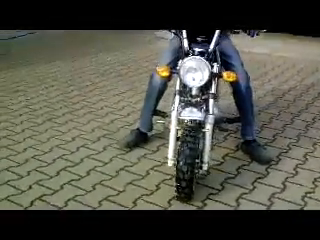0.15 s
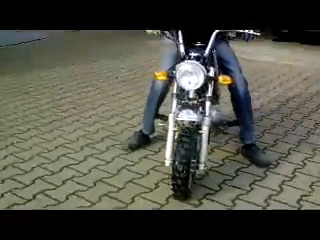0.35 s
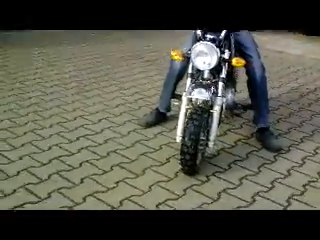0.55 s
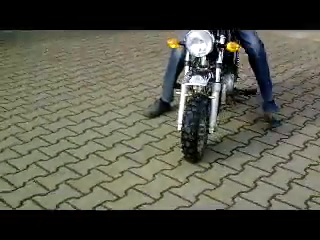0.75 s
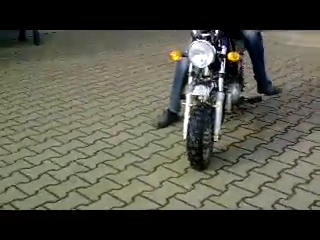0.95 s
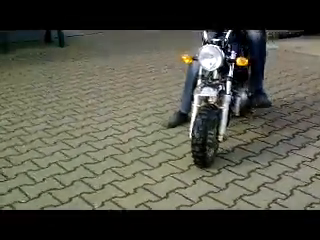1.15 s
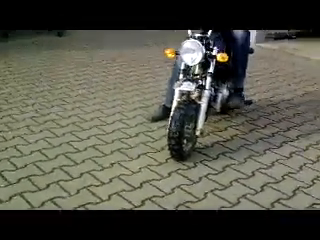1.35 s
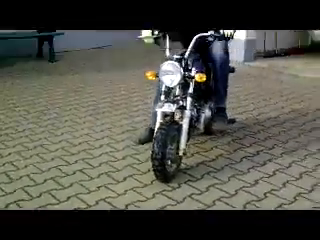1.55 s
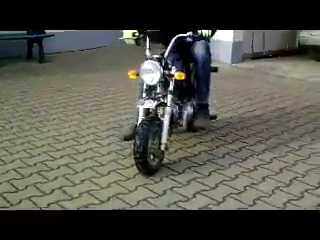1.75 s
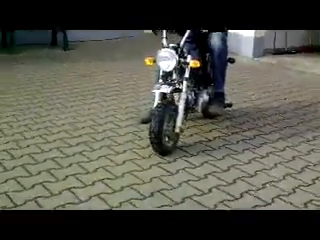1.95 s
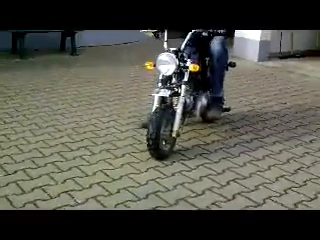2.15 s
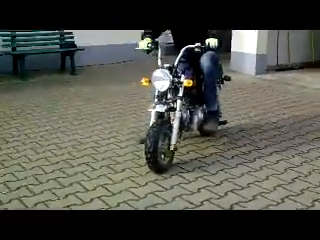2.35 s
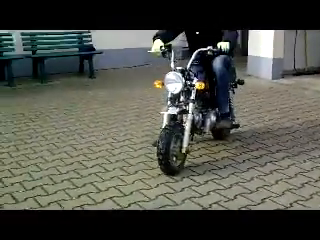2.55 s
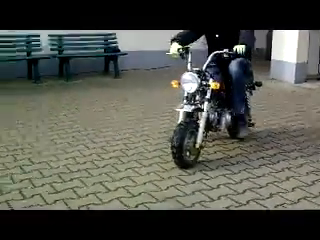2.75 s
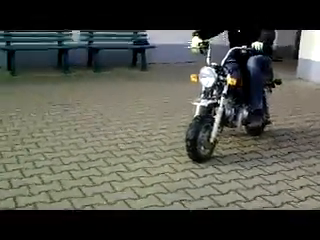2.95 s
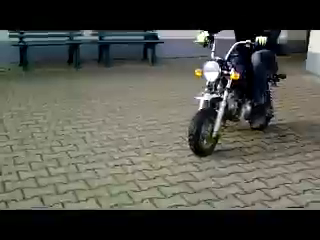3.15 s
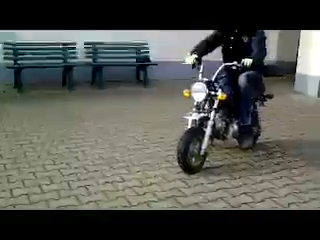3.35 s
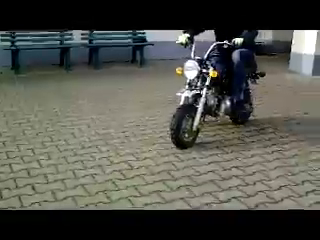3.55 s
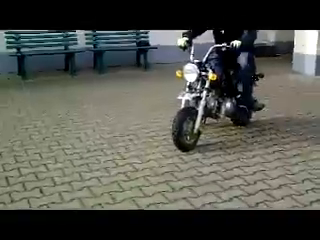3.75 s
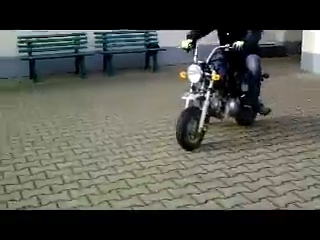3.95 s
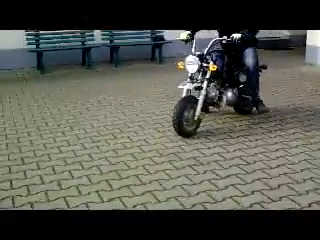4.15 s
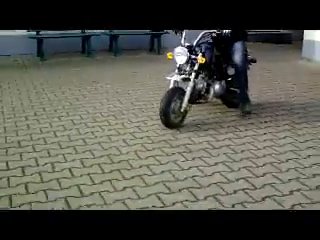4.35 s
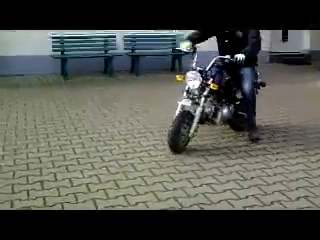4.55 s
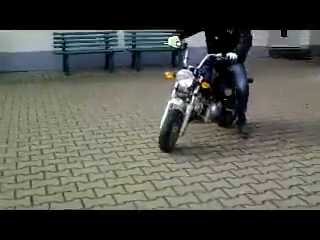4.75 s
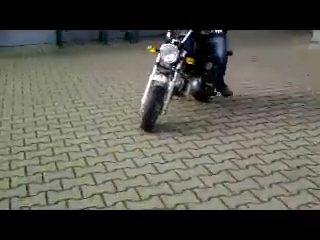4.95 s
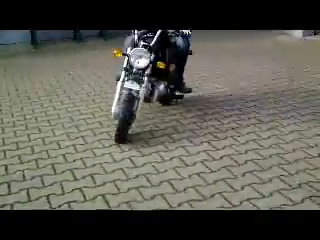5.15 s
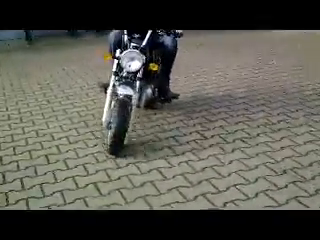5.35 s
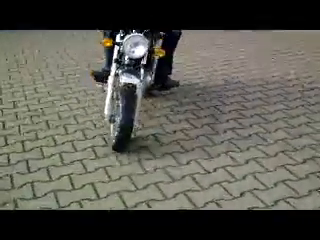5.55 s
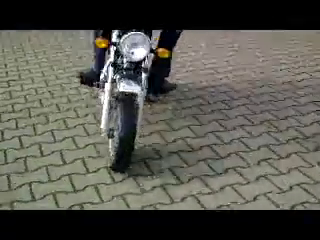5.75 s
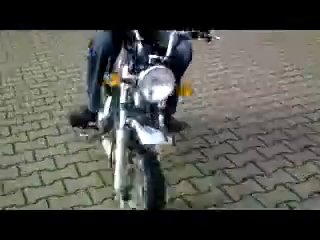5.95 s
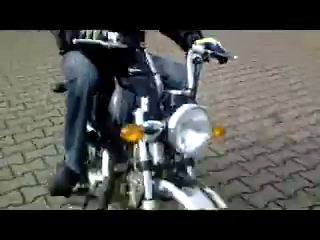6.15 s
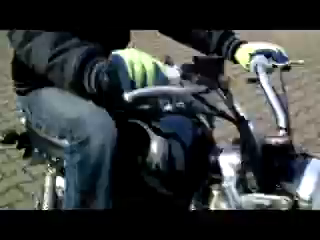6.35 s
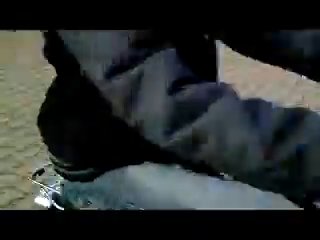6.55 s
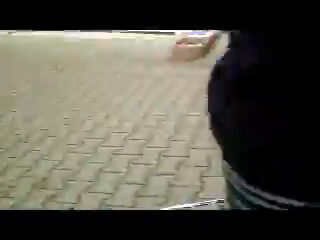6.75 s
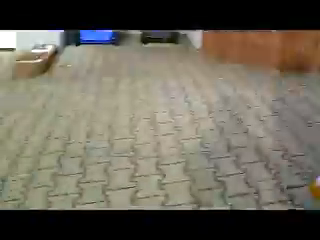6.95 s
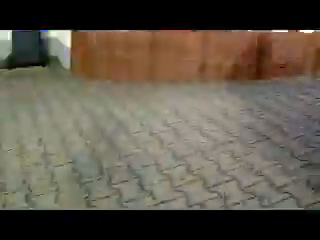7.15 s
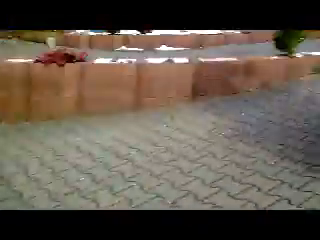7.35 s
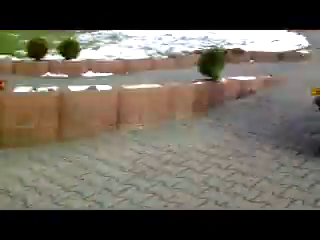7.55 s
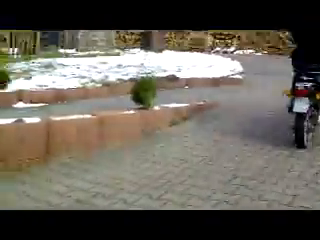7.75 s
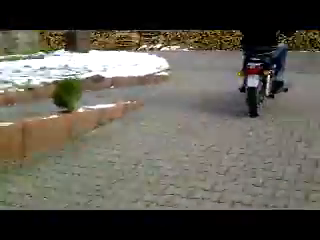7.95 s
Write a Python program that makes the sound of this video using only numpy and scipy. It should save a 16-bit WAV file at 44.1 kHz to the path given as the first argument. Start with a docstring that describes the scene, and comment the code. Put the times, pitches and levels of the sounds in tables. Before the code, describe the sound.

A small single-cylinder motorbike revs, idles unevenly, then accelerates close past and rides away across a paved yard.

```python
"""A paved yard, where a one-cylinder four-stroke mini bike revs twice, idles unevenly with a few clanks,
then pulls away, passes close by and leaves with its exhaust pointing back at us.
Each firing of the engine makes a thump in the silencer, a ring and a bark in the pipe and a puff of rasp.
With the throttle shut, the piston adds a second beat and the idle pops and stumbles.
The walls echo it all over a low outdoor rumble."""
import sys
import numpy as np
from scipy import signal
from scipy.io import wavfile
from scipy.ndimage import uniform_filter1d

SR = 44100
rng = np.random.default_rng(int(sys.argv[2]) if len(sys.argv) > 2 else 0)


def store_pcm(level_fs):
    """Save levels as 16-bit WAV."""
    pcm = np.round(np.clip(level_fs, -1, 1) * 32767).astype(np.int16)
    wavfile.write(sys.argv[1], SR, np.atleast_2d(pcm).T)


N = 353682
TIME = np.arange(N) / SR
IDLE_RATE, PULLING_RATE = 15, 26  # firings a second
USUAL_DISTANCE_M = 3

# how fast the engine runs: (time [s], firings [per s])
ENGINE_SPEED = [(0.0, 24.138), (0.13, 25.523), (0.5, 22.395), (0.64, 27.3), (.8, 26), (0.9, 24.428),
                (1.02, 22.6), (1.25, 20.804), (1.35, 19.3), (1.55, 19.35), (1.8, 16.872), (2.43, 12.51),
                (2.6, 19.153), (3.08, 15.713), (3.32, 14.992), (3.42, 20.253), (3.75, 23.941),
                (3.85, 24.75), (3.97, 26.3), (4.35, 26.48), (4.6, 27.204), (4.95, 26.614), (5.12, 25.205),
                (5.38, 25.3), (5.58, 23.045), (5.72, 24.705), (6.1, 31.285), (6.5, 35.508), (6.85, 38.994),
                (7.05, 39.393), (7.25, 41.104), (7.42, 41.898), (7.6, 43.302), (8.02, 45.356)]
# the bike's ride: (time [s], distance [m], share heard from behind [0-1], wall echo delay [s])
BIKE_PATH = [(0, 1.77, 0, 0.025), (.7, 2.47, 0.09, 0.021), (1.3, 2.35, 0.2, 0.016), (2.1, 2.02, 0, 0.018),
             (2.6, 1.97, 0.03, 0.011), (3.6, 2.58, 0.2, 0.022), (4.5, 2.39, 0.15, 0.016),
             (5.4, 2.07, 0.08, 0.022), (5.8, 2.44, 0.14, 0.018), (6.15, 1.12, 0.07, .02),
             (6.58, 0.75, 0.26, 0.016), (6.92, 1.1, 0.83, 0.016), (7.2, 1.59, 0.97, 0.014),
             (8.02, 2.37, 0.79, 0.0075)]


def engine():
    """The firings drive the exhaust and shake the metal. Returns the low thump and the sharper sounds."""
    rate, = curves(ENGINE_SPEED)
    uneven_db = 1.3 * (IDLE_RATE / rate) ** 2  # a slow engine fires less evenly
    thump = silencer_thump(rate, uneven_db)
    burble = idle_burble(rate, uneven_db)
    # the steep front of each gush of gas hits the pipe like a blow
    blows = -np.sqrt(lumps()) * pulses(rate, uneven_db, lead=0.00048, jitter=.00002)
    pipe = pipe_ring(blows, rate) + pipe_bark(blows)
    return thump, burble + pipe + gas_rasp(blows, rate, uneven_db) + casing_rattle(rate)


def silencer_thump(rate, uneven_db):
    """Each gush of gas leaves with a thump. With the throttle shut, the rising piston adds a beat."""
    # tone of the thump from the front, from behind, and of the piston's push: (pitch [Hz], level [dB])
    front_tone = [(25, -61), (45, -30.5), (75, -19.5), (97, -10), (120, -5), (160, -0.5), (210, -4),
                  (240, -10.5), (280, -21.5), (380, -29), (480, -43), (900, -24), (3000, -96)]
    rear_tone = [(30, -36), (85, -13.5), (122, -22.5), (160, 5), (203, 11), (228, 8.5), (260, 0.5),
                 (305, -4.5), (355, -7), (425, -9), (520, -14), (620, -5), (900, -25), (3000, -56.5)]
    piston_tone = [(25, -63), (50, -37), (80, -12.5), (115, -5.5), (160, 5), (215, -5), (280, -15.5),
                   (400, -6.5), (520, -33), (900, -42), (3000, -88)]
    level_db, strength = loudness("thump", rate), lumps()
    gushes = strength * pulses(rate, uneven_db, lead=0.003717, jitter=.00004)
    thump = amp(level_db) * unit_level(facing(gushes, front_tone, rear_tone))
    pushes = pulses(rate, uneven_db, lead=.008 - .37 / rate, jitter=0.00047)  # about 1/3 cycle later
    second_beat = amp(level_db - 4) * colour(pushes * np.sqrt(strength), piston_tone)
    beat_share = throttle_shut() * np.clip(2 * idleness(rate), 0, 1)
    return thump * amp(-2.5 * beat_share) + beat_share * second_beat


def pipe_ring(blows, rate):
    """Each blow rings the pipe. With the throttle shut, little gas flows and a thin note rings on."""
    # the pipe's note shifts with the heat of the gas and the bike's heading: (time [s], pitch [Hz])
    pipe_note = [(0, 606), (3.4, 609), (3.8, 696), (4.2, 668), (4.5, 660), (4.9, 652), (5.2, 660),
                 (5.5, 660), (5.75, 629), (6.2, 651), (6.55, 688), (6.66, 725), (6.72, 825), (6.87, 860),
                 (6.95, 1010), (8.02, 1083)]
    # the pipe's resonances: (multiple of that note, width [Hz], level [dB])
    pipe_modes = [(1, 68, 25), (1.08, 8.5, 1), (.92, 31, 16.5)]
    hz, = curves(pipe_note)
    _, extra_db = throttle()
    ring = sum(amp(db) * resonate(blows, hz * multiple, width) for multiple, width, db in pipe_modes)
    ring = resonate(ring, hz, width_hz=136)  # the outlet narrows the tone once more
    ring = amp(loudness("ring", rate) + extra_db) * unit_level(ring)
    thin_note = unit_level(resonate(blows, hz=660, width_hz=13))
    return ring + throttle_shut() * amp(-50.5 - 20 * idleness(rate) ** 2) * thin_note


def pipe_bark(blows):
    """The pipe barks: one tight pop with the throttle open, spreading into a flutter as it shuts."""
    # tone of the bark from the front and from behind: (pitch [Hz], level [dB])
    front_tone = [(250, -48), (520, -34.5), (620, 0.5), (720, 4), (790, 13), (860, 3.5), (1020, 2),
                  (1200, -2.5), (1550, -20), (2050, -5.5), (2900, -29.5), (8000, -37.5)]
    rear_tone = [(130, -31.5), (280, 4.5), (430, 12.5), (520, 0), (680, -14), (830, 12.5), (920, 0.5),
                 (1050, 12.5), (1250, 3), (1500, -3.5), (2100, -36), (2900, -33), (8000, -34.5)]
    rate, = curves(ENGINE_SPEED)
    opening, _ = throttle()
    flutter = amp(-7 - 22 * opening) * puffs(blows, decay_s=.012)
    return amp(loudness("bark", rate)) * unit_level(facing(blows + flutter, front_tone, rear_tone))


def gas_rasp(blows, rate, uneven_db):
    """Gas tears past the valve, valves tick shut, chain and gears whirr. Open throttle adds a spit."""
    # tone of the rasp and of the short spit that starts a firing: (pitch [Hz], level [dB])
    rasp_tone = [(300, -35), (900, 8), (1350, -0.5), (1750, -3.5), (2100, -1), (2500, -7), (3100, -14.5),
                 (4000, -13.5), (5200, -16.5), (6400, -20.5), (7900, -29.5), (8900, -25), (9500, -32.5),
                 (10500, -48)]
    spit_tone = [(400, -28.5), (900, -6.5), (1400, 4), (2200, 2), (2900, -8.5), (6000, -17), (10000, -37)]
    opening, _ = throttle()
    valves = pulses(rate, uneven_db + 8.5, lead=0.0059, jitter=0.00013)
    valves += pulses(rate, uneven_db - 1, lead=-0.0038, jitter=0.00036)
    whirr = amp(-18) * puffs(valves, decay_s=0.0027) + amp(-1.5) * rng.standard_normal(N)
    tear_gain = amp(-10 + 12.6 * opening)
    grit = (tear_gain * puffs(blows, decay_s=0.0097) + whirr) / np.sqrt(.5 + tear_gain ** 2)
    spit = opening ** 2 * amp(-1.5) * colour(puffs(blows, decay_s=.002), spit_tone)
    return amp(loudness("rasp", rate)) * (colour(grit, rasp_tone) + spit)


def idle_burble(rate, uneven_db):
    """At idle, fuel burns late and raggedly, so a hollow burble follows each thump."""
    # tone of the burble: (pitch [Hz], level [dB])
    burble_tone = [(55, -11), (105, -2), (165, -6), (280, 4), (350, 0.5), (420, 9), (500, 3), (600, -34.5),
                   (1000, -21), (3000, -79)]
    late_burns = lumps() ** 2.2 * pulses(rate, uneven_db, lead=-0.0011, jitter=0.00028)
    burble = colour(late_burns + puffs(late_burns, decay_s=0.0097), burble_tone)
    return idleness(rate) * amp(loudness("thump", rate) - 17) * burble


def silencer_boom():
    """The outflowing gas pulses, smooth and deep, and the hollow silencer can growls."""
    # tones at 1, 2 and 3 times the firing rate: (level from the front [dB], level from behind [dB])
    outflow_tones = [(-9.5, -4.5), (-10, -0.5), (-10, -32)]
    # hollow tone of the can: (pitch [Hz], level [dB])
    can_tone = [(150, -37), (290, -20.5), (345, 2.5), (390, -2), (430, 3), (485, -20), (620, -45),
                (2000, -83)]
    rate, = curves(ENGINE_SPEED)
    _, behind, _ = curves(BIKE_PATH)
    angle = 2 * np.pi * np.cumsum(rate) / SR
    outflow = np.sqrt(2) * sum(amp(front_db + (rear_db - front_db) * behind) * np.cos(multiple * angle)
                               for multiple, (front_db, rear_db) in enumerate(outflow_tones, 1))
    pushes = lumps() ** 1.5 * pulses(rate, uneven_db=1.5 + idleness(rate), lead=0.0016, jitter=0)
    side_on_db = 6 * np.exp(-((TIME - 6.84) / .18) ** 2)  # louder as the can passes side-on
    growl = amp(loudness("growl", rate) + side_on_db) * colour(pushes, can_tone)
    return amp(loudness("boom", rate)) * outflow + growl


def exhaust_cracks():
    """A full charge bursts from the pipe as a short shock, and the wall slaps it back."""
    # extra hard firings: (time [s], peak level [dB])
    hard_firings = [(.0395, -19.5), (.081, -39), (.538, -22.5), (.58, -32), (.618, -27), (2.5102, -28.5),
                    (2.571, -22), (3.346, -32), (3.402, -25), (5.894, -24.5), (6.128, -17), (6.223, -22),
                    (6.6273, -16), (6.8635, -21)]
    # tone of a crack: (pitch [Hz], level [dB])
    crack_tone = [(50, -33), (150, -6), (500, 11), (1000, 17.5), (1400, 3), (2000, -9), (3000, -20.5),
                  (6000, -20), (10000, -47)]
    out, t = np.zeros(N), TIME[:SR // 40]
    for start, db in hard_firings:
        shock = 0.12 * np.exp(-t / 0.0013) * rng.standard_normal(len(t))
        shock[0] = -1  # one sharp spike leads the noise
        shock = colour(shock, crack_tone)
        add(out, start, amp(db) * shock / abs(shock).max())
    distance, _, _ = curves(BIKE_PATH)
    return out + amp(-3) * distance / USUAL_DISTANCE_M * delayed(out, 0.026)


def casing_rattle(rate):
    """Thin metal on the engine rings from the firings, from loose parts and from a few knocks."""
    # the metal's resonances: (pitch [Hz], width [Hz], level [dB])
    metal_modes = [(1284, 18, -2), (1364, 33, -3.5), (1609, 36, -3), (1773, 19, -10), (2058, 71, 3.5),
                   (2485, 16, -12), (2702, 26, -17.5)]
    # knocks that stand out: (time [s], peak level [dB])
    knocks = [(4.446, -40), (4.822, -41), (6.311, -33), (6.341, -25), (6.597, -22.5), (6.862, -31)]
    ticks_per_s, knock_hz, knock_fade_s = 140, 2097, 0.059
    blows = pulses(rate, uneven_db=np.full(N, 2.5), lead=0, jitter=.0001)
    ticks = unit_level(rng.standard_normal(N) * (rng.random(N) < ticks_per_s / SR))
    shaking = blows + amp(3.5) * ticks
    ring = sum(amp(db) * resonate(shaking, hz, width) for hz, width, db in metal_modes)
    out = amp(loudness("casing", rate)) * unit_level(ring)
    t = TIME[:SR // 5]
    for start, db in knocks:
        add(out, start, amp(db - 60 * t / knock_fade_s) * np.sin(2 * np.pi * knock_hz * t))
    return out


def lever_clanks():
    """A foot lever strikes its stop and chatters against it for a moment."""
    # the clanks: (time [s], level [dB], rattle length [s], brightness [dB per octave])
    clanks = [(.735, -56.5, 0.0037, 7.5), (1.29, -55, 0.0011, 6.5), (2.086, -48, 0.046, 6),
              (3.001, -48, 0.054, 3), (3.174, -54, 0.041, 9.5)]
    # tone of struck steel: (pitch [Hz], level [dB])
    steel_tone = [(300, 2), (900, 36), (1500, 15), (2400, 14), (3300, 4), (5500, -3), (7500, -15),
                  (8700, -20), (10000, -76)]
    # the lever's resonances: (pitch [Hz], width [Hz], level [dB])
    lever_modes = [(839, 23, -1), (2230, 53, -17)]
    out, t = np.zeros(N), TIME[:SR // 5]
    for start, db, length, bright_db in clanks:
        chatter = rng.standard_normal(len(t)) * amp(5.3 * rng.standard_normal(len(t)))
        strike = 1 + 3.3 * np.exp(-t / 0.003)
        fade = np.exp(-np.maximum(t - length, 0) / 0.008)
        ring = sum(amp(level) * resonate(chatter, hz, width) for hz, width, level in lever_modes)
        tone = [(hz, level + bright_db * np.log2(hz)) for hz, level in steel_tone]
        add(out, start, amp(db) * strike * fade * unit_level(colour(chatter, tone) + ring))
    return out


def throttle():
    """How far the throttle is open (0-1) and how loudly the pipe rings, in each stretch of the ride."""
    # stretches of the ride: (start [s], end [s], throttle opening [0-1], change in the pipe's ring [dB])
    stretches = [(0, 0.108, 0.54, 2), (0.527, 0.632, 0.8, 5.5), (.7, 1.62, 0, 3), (2.499, 2.577, 0.76, 9),
                 (3.312, 3.404, 0.76, 12), (3.414, 3.844, 0.44, 8), (3.843, 4.929, 0.35, 10),
                 (4.929, 5.39, 0.33, 5), (5.385, 5.581, 0.49, 8.5), (5.592, 5.997, 0.78, 3),
                 (5.998, 6.5, 0.84, 2), (6.5, 6.69, 0.77, 7.5), (6.686, 6.87, 0.7, 18),
                 (6.875, 7.294, 0.46, 5), (7.302, 8.1, 0.57, -16)]
    ramp_s = 0.018
    active = np.array([np.interp(TIME, [start, start + ramp_s, end, end + ramp_s], [0, 1, 1, 0])
                       for start, end, *_ in stretches])
    opening, ring_db = np.transpose(stretches)[2:] @ active
    return np.clip(opening, 0, 1), ring_db


def throttle_shut():
    """1 with the throttle shut, 0 once it is about a fifth open."""
    return np.clip(1 - throttle()[0] / 0.21, 0, 1)


def idleness(rate):
    """1 at idle, 0 once the engine turns fast enough to pull."""
    return np.clip((PULLING_RATE - rate) / (PULLING_RATE - IDLE_RATE), 0, 1)


def lumps():
    """The strength of the firings: usually 1, but at idle some pop harder and some nearly fail."""
    # the odd firings: (time [s], level change [dB])
    odd_firings = [(1.6, 1.5), (1.71, -4.5), (1.95, 2.5), (2.15, 0), (2.29, 1), (2.365, -9), (2.44, 2),
                   (2.625, 5), (2.845, 3), (2.905, -5), (2.965, 2.5), (3.025, -9), (3.09, 2), (3.155, -4.5),
                   (3.215, 1.5)]
    return amp(sum(db * (abs(TIME - when) < .025) for when, db in odd_firings))


def loudness(part, rate):
    """A part's level in dB follows the throttle, engine speed, distance and heading."""
    # for each part: (level coasting at the usual distance [dB], change at full throttle [dB],
    # at idle [dB], per halving of the distance [dB], from behind [dB])
    part_levels = {"thump": (-38.5, 10.5, -8.5, 3, 3), "ring": (-52.5, 3, -13, 6.5, -6.5),
                   "bark": (-58.5, 19, -14.5, 6, 8), "rasp": (-58.5, 7.5, -8.5, 8.5, 9.5),
                   "casing": (-64, -0.5, -15.5, 13, 0.5), "boom": (-56.5, 4, -7, 9, 13.5),
                   "growl": (-49, 4, -14.5, 5.5, 7.5)}
    distance, behind, _ = curves(BIKE_PATH)
    halvings = np.log2(USUAL_DISTANCE_M / distance)
    return np.dot(part_levels[part], [np.ones(N), throttle()[0], idleness(rate), halvings, behind])


def facing(x, front_tone, rear_tone):
    """The tone changes as the tailpipe turns toward us."""
    _, behind, _ = curves(BIKE_PATH)
    return (1 - behind) * colour(x, front_tone) + behind * colour(x, rear_tone)


def yard_echoes(x, patterns=4):
    """Scattered echoes off walls and benches; their pattern changes as the bike moves."""
    # how long the yard rings: (pitch [Hz], time to fade by 60 dB [s])
    fade_times = [(150, 0.29), (700, 0.6), (2500, 0.13), (9000, 0.14)]
    out, t = np.zeros(N), TIME[:SR // 2]
    for k in range(patterns):
        echoes = rng.choice([-1., 1.], len(t)) * (rng.random(len(t)) < 1 / 24) * (t > .008)
        hz, age, spectrum = signal.stft(echoes, SR, nperseg=256)
        _, tail = signal.istft(spectrum * amp(-60 * age / value_at(fade_times, hz)[:, None]), SR)
        crossfade = np.cos(np.pi / 2 * np.clip(TIME / TIME[-1] * (patterns - 1) - k, -1, 1))
        out += signal.oaconvolve(x * crossfade, tail / np.linalg.norm(tail))[:N]
    return out


def outdoor_rumble():
    """Low noise that slowly swells and sinks."""
    # loudness of the rumble: (time [s], level [dB])
    rumble_levels = [(0, -39), (1.7, -48), (2.5, -50.5), (5.3, -46), (5.9, -39), (8.02, -52)]
    # its tone: (pitch [Hz], level [dB])
    rumble_tone = [(15, -12.5), (25, -13.5), (38, -3.5), (70, -5.5), (150, -13.5), (300, -11.5), (700, -23),
                   (1500, -42.5), (3000, -43.5), (6000, -56.5), (10000, -75.5)]
    level_db, = curves(rumble_levels)
    return amp(level_db) * colour(rng.standard_normal(N), rumble_tone)


def pulses(rate, uneven_db, lead, jitter):
    """One push of random size per firing, lead seconds early, wavering by jitter seconds per uneven dB."""
    firings = np.flatnonzero(np.diff(np.floor(np.cumsum(rate) / SR)))
    size, late = np.clip(rng.standard_normal((len(firings), 2)).T, -1.6, 1.6)
    shift_s = late * jitter * uneven_db[firings] - np.broadcast_to(lead, N)[firings]
    at = np.clip(firings + np.round(shift_s * SR).astype(int), 0, N - 1)
    out = np.zeros(N)
    out[at] = amp(size * uneven_db[firings]) * np.sqrt(SR / rate[firings])
    return out


def puffs(pushes, decay_s):
    """A hiss of swirling gas swells and dies after every push, with the same power as the push."""
    keep = np.exp(-2 / (decay_s * SR))
    power = uniform_filter1d(signal.lfilter([1 - keep], [1, -keep], pushes ** 2), size=90)
    return np.sqrt(abs(power)) * rng.standard_normal(N)


def resonate(x, hz, width_hz):
    """Rings at a steady or moving pitch; the smaller the width, the longer the ring."""
    turn = np.exp(2j * np.pi * np.cumsum(np.broadcast_to(hz, len(x))) / SR)
    keep = np.exp(-np.pi * width_hz / SR)
    return np.sqrt(2 * (1 - keep ** 2)) * (turn * signal.lfilter([1], [1, -keep], x / turn)).imag


def colour(x, tone, size=8192):
    """Gives a sound the tone in a table; plain white noise would keep its power."""
    log_gain = np.log(amp(value_at(tone, abs(np.fft.fftfreq(size, 1 / SR)))))
    taps = np.fft.ifft(np.exp(np.conj(signal.hilbert(log_gain)))).real[:size // 2]  # rings only after a hit
    return signal.oaconvolve(x, taps / np.linalg.norm(taps))[:len(x)]


def amp(db):
    """Decibels to gain."""
    return 10 ** (np.asarray(db) / 20)


def unit_level(x):
    """Scales a sound to an average power of 1."""
    return x / np.sqrt(np.mean(x ** 2) + 1e-20)


def curves(rows):
    """Turns each column after the time into a curve over the whole scene."""
    times, *columns = np.transpose(rows)
    return [np.interp(TIME, times, column) for column in columns]


def value_at(rows, hz):
    """Looks up a table at any pitch."""
    pitches, values = np.transpose(rows)
    return np.interp(np.log(hz + 1), np.log(pitches + 1), values)


def add(mix, start_s, sound):
    """Lays a sound into the mix."""
    part = mix[max(round(start_s * SR), 0):][:len(sound)]
    part += sound[:len(part)]


def delayed(x, seconds):
    """Delays a sound by a steady or changing time."""
    return np.interp(TIME - seconds, TIME, x, left=0, right=0)


def scene():
    """The bike, the slap from the wall behind it and the yard, heard at one point."""
    thump, sharp = engine()
    distance, behind, echo_s = curves(BIKE_PATH)
    wall_gain = amp(-8.5 - 1.5 * throttle()[0])  # the slap stands out most with the throttle shut
    slap = wall_gain * delayed(.6 * thump + .8 * sharp, echo_s)
    bike = (thump + sharp + slap) / np.sqrt(1 + wall_gain ** 2 / 2)
    hits = exhaust_cracks() + lever_clanks()
    boom = silencer_boom()
    yard_gain = np.sqrt(wall_gain * distance / USUAL_DISTANCE_M) * amp(-4.5 + 3.5 * behind)
    echoes = yard_echoes(yard_gain * (.5 * thump + sharp) + amp(-15.5) * hits)
    mono = bike + boom + hits + echoes + outdoor_rumble()
    return np.array([mono, mono])


def record(dry):
    """The microphone rounds off the loudest peaks and loses the highest treble."""
    ceiling, top_hz = .34, 10550
    squashed = dry / (1 + (dry / ceiling) ** 6) ** (1 / 6)
    treble_cut = signal.firwin(401, top_hz, window=("kaiser", 9), fs=SR)
    return signal.oaconvolve(squashed, treble_cut[None], "same")


dry = scene()
out = record(dry)
store_pcm(out)
```